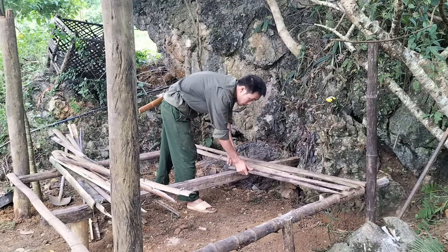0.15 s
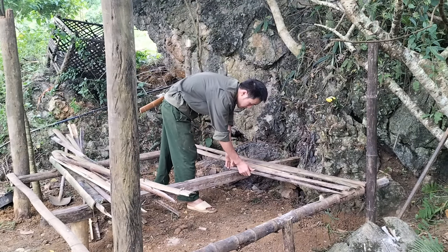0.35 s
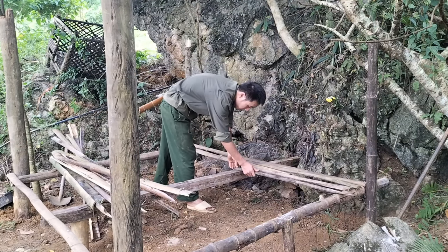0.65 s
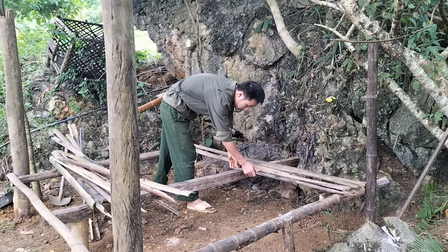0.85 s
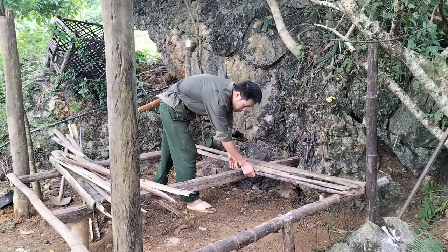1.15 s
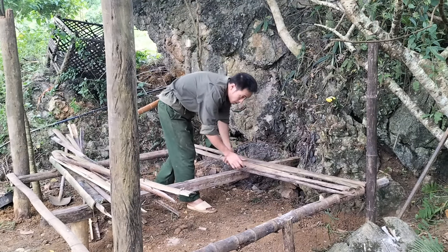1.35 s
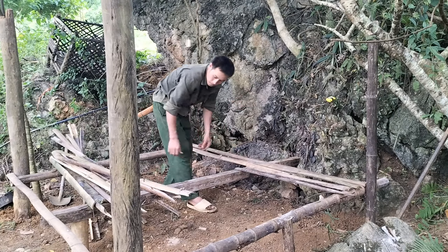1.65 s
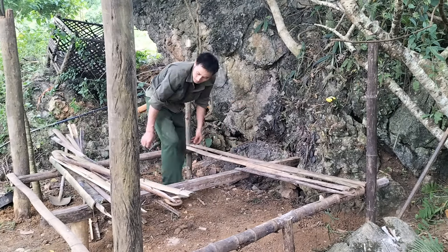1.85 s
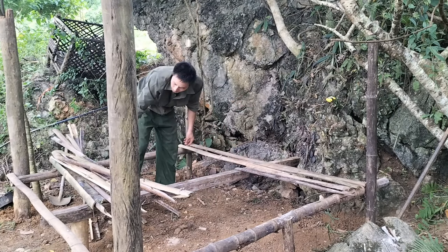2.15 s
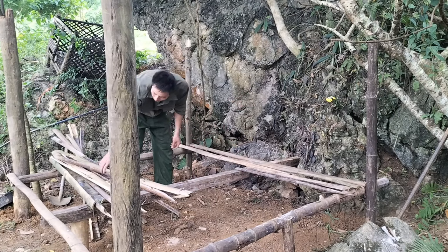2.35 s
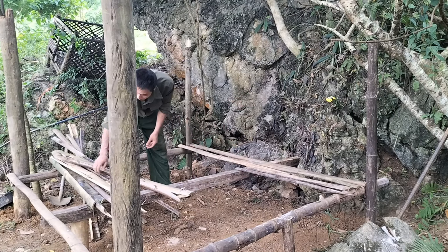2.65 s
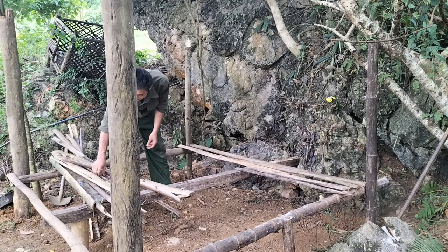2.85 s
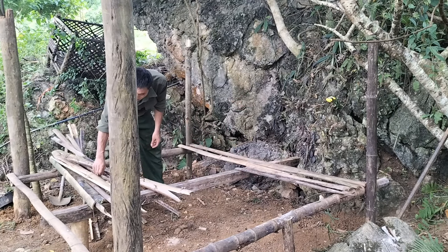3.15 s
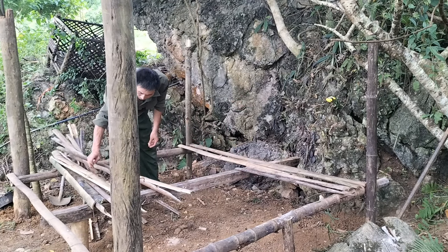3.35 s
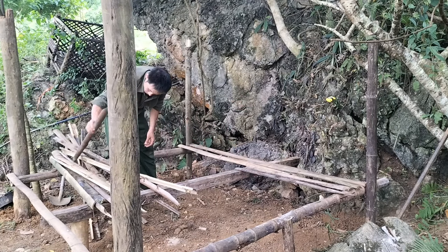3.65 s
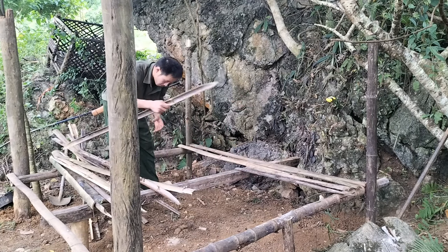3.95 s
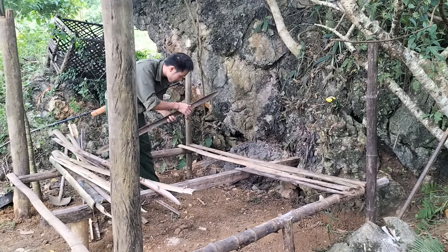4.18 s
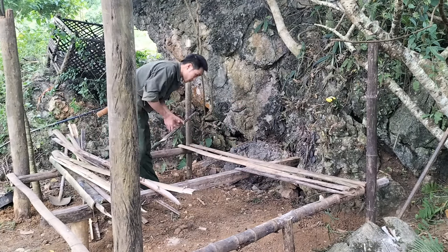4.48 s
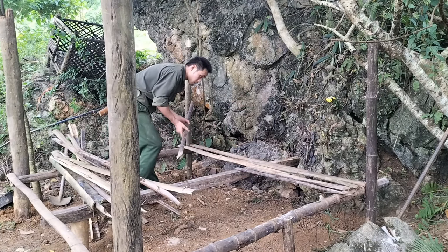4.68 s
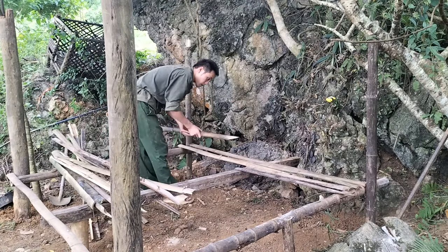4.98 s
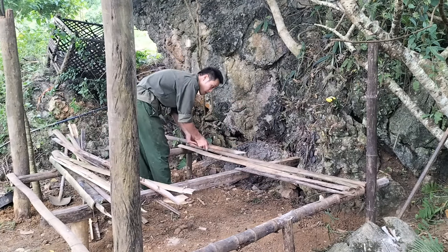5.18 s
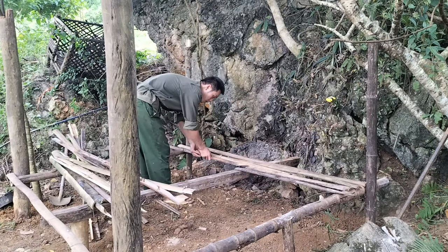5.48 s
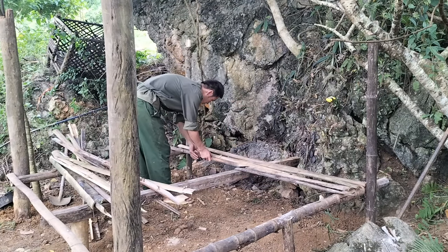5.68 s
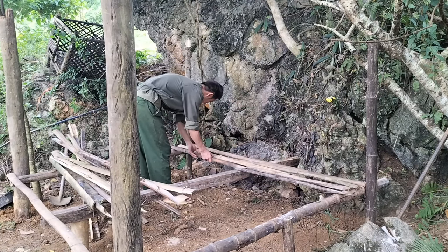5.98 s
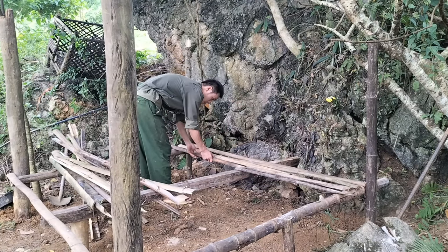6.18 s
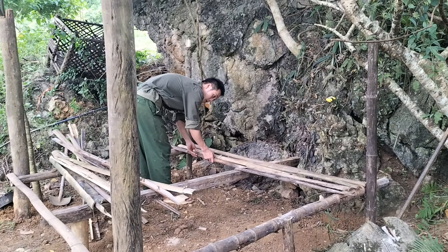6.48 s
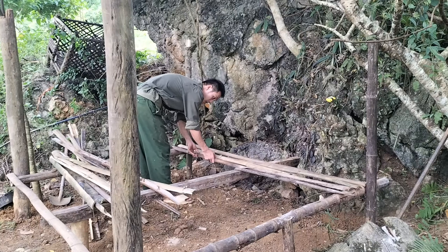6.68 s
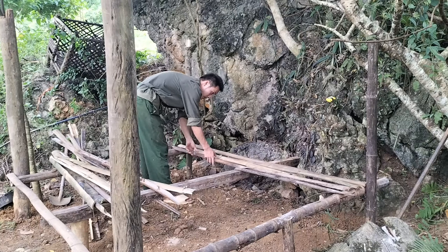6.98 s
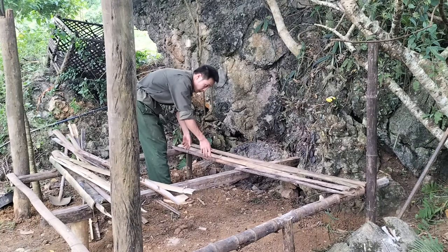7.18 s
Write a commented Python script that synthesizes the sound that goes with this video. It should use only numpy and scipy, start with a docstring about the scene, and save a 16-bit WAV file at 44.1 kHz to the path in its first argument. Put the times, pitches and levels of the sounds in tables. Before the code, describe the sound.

Dry wooden knocks, a rattling slat dragged from a heap and set down hard, over steady insect drone and bird chirps outdoors.

```python
"""Bamboo slats knock on a wooden frame under a rock face: each blow cracks, rattles and rings, with a diffuse echo.
All along, the forest air hisses, two cicadas pulse and a third insect buzzes about twice a second.
Birds join in with a falling trill, whistles, slurs, sharp chips, piping and one long thin whistle.
Then slats knock in a pile, and one is dragged off it, its scrape made of many tiny slips; a fibre snaps.
The slat is laid down with more knocks on the frame, and hollow poles answer with damped notes."""
import sys
import numpy as np
from scipy import signal
from scipy.fft import rfft, irfft
from scipy.io import wavfile

SR = 44100
rng = np.random.default_rng(int(sys.argv[2]) if len(sys.argv) > 2 else 0)


def log_audio(samples):
    """Write samples as a 16-bit WAV file to the path given in sys.argv[1]."""
    # one column per channel
    frames = np.atleast_2d(samples).T
    # limit to full scale, then quantise
    limited = np.clip(frames, -1, 1)
    pcm = np.round(limited * 32767).astype(np.int16)
    wavfile.write(sys.argv[1], SR, pcm)


N = 323253
TIME = np.arange(N) / SR


def undb(db):
    """Turn decibels into a gain."""
    return 10 ** (np.asarray(db) / 20)


def unit(x):
    """Scale to an rms (average strength) of 1."""
    return x / np.sqrt(np.mean(x ** 2) + 1e-24)


def add(out, s, x):
    """Mix x into out from time s."""
    i = int(np.clip(s * SR, 0, N))
    out[i:i + len(x)] += x[:N - i]


def clock(length_s):
    """Sample times of a short sound, in seconds."""
    return np.arange(int(length_s * SR)) / SR


def fade(t, t60):
    """Exponential decay that falls 60 dB in t60 seconds."""
    return np.exp(-np.log(1000) * t / max(t60, 1e-3))


def gate(s, attack_s, hold_s, release_s):
    """Level that rises from time s, holds, then decays 60 dB in release_s."""
    t = TIME - s
    rise = np.clip(t / max(attack_s, 1e-3), 0, 1)
    return rise * fade(np.maximum(t - attack_s - hold_s, 0), release_s)


def walk(rate, size=N):
    """Smooth random wander: chance levels, rate of them per second, joined by straight lines."""
    levels = rng.standard_normal(2400)
    return np.interp(np.arange(size) * rate / SR, np.arange(len(levels)), levels)


def colour(x, points):
    """Filter through (Hz, dB) points, without any sound ahead of its cause (minimum phase)."""
    hz, db = np.transpose(points)
    size = 2048
    f = np.arange(size // 2 + 1) * SR / size
    curve_db = np.interp(np.log(f + 1), np.log(hz), db)
    # folding the cepstrum puts the filter's energy as early as possible
    cepstrum = irfft(np.log(undb(curve_db)))
    cepstrum[1:size // 2] *= 2
    cepstrum[size // 2 + 1:] = 0
    impulse = irfft(np.exp(rfft(cepstrum)))
    return signal.fftconvolve(x, impulse)[:len(x)]


def ring(x, modes, dead_db):
    """Bamboo body: distinct bending modes over a quickly damped rest, here the plain input."""
    out = undb(dead_db) * x
    for hz, width, db in modes:
        b, a = signal.iirpeak(hz, hz / width, SR)
        out = out + undb(db) * signal.lfilter(b, a, x)
    return out


def echo(x, t60, wet_db, delay_s):
    """Direct sound plus a diffuse tail: many reflections blur into decaying noise."""
    t = clock(.5)
    noise = rng.standard_normal(len(t)) * fade(t, t60) * (t > delay_s)
    tail = unit(noise) / np.sqrt(len(t))
    return x + undb(wet_db) * signal.oaconvolve(x, tail)[:len(x)]


def note(length_s, pitches, rasp):
    """A whistle gliding through start, middle and end pitch; fast flutter (a bird's syrinx) makes it raspy."""
    t = clock(length_s)
    u = t / length_s
    flutter = walk(700, size=len(t))
    glide = np.polyval(np.polyfit([0, .5, 1], pitches, 2), u)
    hz = glide * (1 + .14 * rasp * flutter)
    return np.sin(2 * np.pi * np.cumsum(hz) / SR) * np.sin(np.pi * u) ** 0.74


def slur(hz, rasp):
    """A bird's down-slur: the pitch of its whistle slides down past hz."""
    return note(0.065, hz * np.array((1.2, 0.98, 0.68)), rasp)


# Harder blows rattle longer: level of a firm blow, and how many dB more double the decay time.
RATTLE_AT_DB, RATTLE_DOUBLING_DB = -46, 34.5
# Tone colour of a blow. Each row: frequency in Hz, level in dB.
CONTACT_COLOUR = [(60, -42), (115, -32), (190, -8), (300, -2), (600, -6.5), (1100, -0.5), (1950, -5),
                  (2800, -1.5), (3900, -3.5), (4700, -14.5), (6000, -14.5), (7500, -29.5), (9000, -44),
                  (15000, -61.5)]


def knocks(table, modes, rattle_s, crack_db, dead_db):
    """A soft start, a hard crack, then a rattle of tiny contacts; where the slat is hit sets its bass and treble."""
    out, t = np.zeros(N), clock(.2)
    bands = ((500, "low"), ((500, 2000), "band"), (2000, "high"))
    splits = [signal.butter(3, hz, kind, fs=SR, output="sos") for hz, kind in bands]
    since_crack = np.maximum(t - .0015, 0)  # the crack comes 1.5 ms in
    for s, db, bass, treble in table:
        t60 = rattle_s * 2 ** ((db - RATTLE_AT_DB) / RATTLE_DOUBLING_DB)
        chance = rng.standard_normal((3, len(t)))
        contacts = chance[0] * undb(4.75 * chance[1])  # very uneven in strength
        rattle = unit(contacts * fade(t, t60) * (1 - fade(t, 0.021)))
        crack = unit(chance[2] * (since_crack > 0) * fade(since_crack, 0.0056))
        force = (rattle + undb(crack_db) * crack) / np.sqrt(len(t))
        blow = ring(colour(force, CONTACT_COLOUR), modes, dead_db)
        for sos, band_db in zip(splits, (bass, 0, treble)):
            add(out, s, undb(db + band_db) * unit(signal.sosfilt(sos, blow)))
    return out


# Slat against frame. Each row: start in seconds, level in dB between 500 and 2000 Hz,
# then bass and treble in dB against that level.
FRAME_KNOCKS = [(0.0, -46.5, -18.5, 2.5), (0.075, -49.5, -20, -0.5), (0.121, -60.5, -14, 0),
                (0.168, -67, -17, 3.5), (0.969, -78.5, -22, -3), (1.003, -76, -15, -18),
                (1.308, -73.5, -12, -8), (1.582, -73, -11, -8), (1.604, -71.5, -11, -28),
                (4.522, -46, -6.5, -7.5), (4.636, -71, -21, -14), (4.751, -58.5, -18, 5.5),
                (4.95, -72.5, -17, -4), (5.068, -75.5, -18, -1), (5.34, -81, -9, -6.5),
                (5.556, -63, -21, -5.5), (5.609, -39.5, -11, -4.5), (6.026, -66.5, -2, -14),
                (6.249, -74, 8.5, -21), (6.459, -71.5, -18, -2), (6.886, -71, -13, -6),
                (6.948, -85.5, -16, -3), (7.04, -78.5, -16, -7), (7.166, -72, -14, -14)]
# Resonances of slat and frame. Each row: frequency in Hz, width in Hz, level in dB.
FRAME_MODES = [(203, 29, -9), (372, 56, -3), (641, 100, -3), (856, 99, -4), (1013, 43, 0), (1122, 31, 0.5),
               (1317, 55, -0.5), (1510, 41, -14), (2180, 31, -13), (2610, 31, -1.5), (2760, 32, -10.5),
               (2780, 51, -9), (3646, 28, -3.5), (3690, 87, -5.5), (3980, 32, -7.5)]


def frame_knocks():
    """Slats strike the wooden frame and set off its resonances; a firm blow rattles for 0.096 s (t60)."""
    return knocks(FRAME_KNOCKS, FRAME_MODES, rattle_s=0.096, crack_db=-2.5, dead_db=-5)


# Hollow notes of the poles. Each row: start in seconds, pitch in Hz, level in dB before the fade.
POLE_NOTES = [(0.002, 101, -58.5), (0.004, 245, -51), (0.08, 97.3, -62), (0.34, 660, -53),
              (1.002, 964, -49.5), (2.594, 677, -50), (2.632, 243, -48.5), (3.845, 241, -40.5),
              (3.867, 174, -54), (4.067, 1136, -38), (4.525, 171, -48.5), (4.527, 247, -44.5),
              (4.53, 374.5, -38), (5.615, 195.6, -48), (6.255, 400.6, -47.5), (6.735, 1087, -40.5)]
POLE_CYCLES = 39  # a pole's note falls 60 dB in this many cycles


def pole_notes():
    """The hollow poles answer with a damped, slightly unsteady note."""
    out, t = np.zeros(N), clock(.5)
    for s, hz, db in POLE_NOTES:
        tone = np.sin(2 * np.pi * hz * t + 1.7 * walk(80, len(t)))
        add(out, s, undb(db) * tone * fade(t, POLE_CYCLES / hz) * (1 - fade(t, 0.011)))
    return out


TICKS_PER_S, TICKS_DB = 30, -81


def handling():
    """Hands and feet raise sparse, soft little ticks from slats and soil, at random moments."""
    ticks = (rng.random(N) < TICKS_PER_S / SR) * undb(1.5 * rng.standard_normal(N))
    soft = colour(ticks, [(100, -8.5), (350, -6), (900, 6.5), (1600, 1.5), (2800, -5), (6000, -44.5)])
    return unit(echo(soft, t60=0.16, wet_db=11, delay_s=.002)) * undb(TICKS_DB)


# Colour of the forest air. Each row: frequency in Hz, level in dB per Hz before scaling.
AIR_COLOUR = [(25, -10.5), (55, 2.5), (100, 1.5), (200, -2), (400, -1.5), (700, -8.5), (1100, -4),
              (1900, -13.5), (2900, -6.5), (3600, -8), (5400, -3), (6600, -9), (7900, 8.5), (8700, -54)]
# Colour of the thin sizzle. Each row: frequency in Hz, level in dB before scaling.
SIZZLE_COLOUR = [(10000, -34), (11000, -11.5), (11900, -2), (12700, -6), (14000, -2.5), (15100, 4),
                 (16000, -5)]
AIR_DB, SIZZLE_DB = -67, -80


def forest():
    """Faint moving air, with a thin sizzle on top: two filtered noises that waver in level."""
    air = unit(colour(rng.standard_normal(N), AIR_COLOUR))
    sizzle = unit(colour(rng.standard_normal(N), SIZZLE_COLOUR))
    return air * undb(AIR_DB + 0.95 * walk(12)) + sizzle * undb(SIZZLE_DB + 1.1 * walk(30))


def cicada(beat, rate_hz, band, chorus_db, uneven_s):
    """Each beat buckles the tymbals in a few gliding chirps; far companions blur into a band of hiss."""
    out = np.zeros(N)
    chance = rng.standard_normal((300, len(beat), 3))
    slip_s = uneven_s * rng.standard_normal(len(chance))
    for k in range(min(int(N / SR * rate_hz) + 1, len(chance))):
        for (delay, start, end, length, db), (late, loud, sharp) in zip(beat, chance[k]):
            u = clock(length) / length
            hz = start + (end - start) * u + 18 * sharp
            # the abdomen's resonance keeps one beat nearly in step with the next
            phase = 2 * np.pi * (np.cumsum(hz) / SR + 0.041 * late)
            chirp = undb(db + 0.36 * loud) * np.sin(phase) * np.sin(np.pi * u)
            add(out, k / rate_hz + slip_s[k] + delay, chirp)
    # leaves smear the beats a little
    out = echo(out, t60=.05, wet_db=-7, delay_s=.0015)
    edges_hz = (band[1][0], band[-2][0])
    out = signal.sosfilt(signal.butter(8, edges_hz, "band", fs=SR, output="sos"), out)
    chorus = unit(colour(rng.standard_normal(N), band))
    return unit(unit(out) + undb(chorus_db) * chorus)


# One beat of the high cicada. Each row: delay in seconds, start and end pitch in Hz,
# length in seconds, level in dB against the other rows.
HIGH_BEAT = [(0, 7540, 7470, 0.0087, 1), (.007, 7460, 6600, 0.011, -3), (.0155, 7500, 7400, 0.0035, -2.5),
             (.0255, 7300, 7100, 0.0029, -12.5)]
# Hiss of its far companions. Each row: frequency in Hz, level in dB before scaling.
HIGH_BAND = [(6200, -40.5), (6700, -25.5), (7050, -1.5), (7500, 15), (7750, -12.5), (7950, -3), (8200, -26),
             (8600, -69)]
HIGH_DB = -57
LULL_S, LULL_END_S, LULL_RAMP_S, LULL_DB = 3.32, 4.58, 0.13, -5  # it eases off once


def high_cicada():
    """The near cicada pulses 29.85 times a second; it and its companions' hiss share one lull."""
    high = cicada(HIGH_BEAT, 29.85, HIGH_BAND, chorus_db=1.5, uneven_s=0)
    lull = np.clip(np.minimum(TIME - LULL_S, LULL_END_S - TIME) / LULL_RAMP_S, 0, 1)
    return high * undb(HIGH_DB + LULL_DB * lull)


# One beat of the low cicada. Each row: delay in seconds, start and end pitch in Hz,
# length in seconds, level in dB against the other rows.
LOW_BEAT = [(0, 4400, 4540, 0.0075, -3.5), (.009, 4350, 3950, .012, -9.5), (.02, 5050, 4650, .012, -10)]
# Hiss of its far companions. Each row: frequency in Hz, level in dB before scaling.
LOW_BAND = [(3300, -34), (3750, 2), (3950, 5.5), (4500, 12), (4850, 2.5), (5100, 8.5), (5220, -30.5),
            (5800, -52.5)]


def low_cicada():
    """A softer, lower cicada buckles its tymbals about 28.5 times a second, a little unevenly."""
    return undb(-66) * cicada(LOW_BEAT, 28.5, LOW_BAND, chorus_db=1.5, uneven_s=.003)


def faint_calls():
    """Many faint slurs and whistles from deep in the forest, at random times and pitches."""
    out = np.zeros(N)
    for k, (late, high, loud) in enumerate(rng.random((30, 3))):
        add(out, (k + late) * N / SR / 30, undb(-78.5 + 4 * loud) * slur(3000 + 600 * high, rasp=.1))
    for when, high, fall, loud in rng.random((36, 4)):
        pitches = (2400 + 1300 * high) * (1 - 0.3 * fall) ** np.arange(0, 1.5, .5)
        add(out, when * N / SR, undb(-72.5 + 4 * loud) * note(0.053, pitches, rasp=0.12))
    return out


# A far bird's falling trill. Each row: start in seconds, level of the first note in dB.
TRILLS = [(0.098, -58), (1.85, -58.5), (4.55, -61.5), (5.651, -59), (6.66, -58.5)]


def trills():
    """A far bird repeats a short falling note 12 times, sinking and fading as it runs out."""
    out = np.zeros(N)
    for s, db in TRILLS:
        for k in range(12):
            loud, sharp, late = rng.standard_normal(3)
            pitches = np.array([1210, 1170, 1100]) - 9 * k + 25 * sharp
            level = undb(db - 1.0 * k + 1.5 * loud)
            add(out, s + k * .052 + .003 * late, level * note(.028, pitches, rasp=.3))
    return out


BUZZ_FIRST_S, BUZZ_LENGTH_S, BUZZ_DB = 0.14, .18, -70.5
BUZZ_PERIOD_S, BUZZ_SLOWING_S = .49, .0068  # each period is longer than the last by the slowing


def buzzing_insect():
    """A third insect buzzes at a slowly slackening pace: a raspy note whose level throbs at 92 Hz."""
    buzz, s = np.zeros(N), BUZZ_FIRST_S
    throb = 1 + 0.53 * np.sin(2 * np.pi * 92 * clock(BUZZ_LENGTH_S))
    for k, loud in enumerate(rng.standard_normal(14)):
        tone = note(BUZZ_LENGTH_S, (5950, 6180, 6150), rasp=.2)
        add(buzz, s, undb(BUZZ_DB + loud) * tone * throb)
        s += BUZZ_PERIOD_S + k * BUZZ_SLOWING_S
    return echo(buzz, t60=0.13, wet_db=2.5, delay_s=0.0026)


# Short falling whistles. Each row: start in seconds, middle pitch in Hz,
# fall as a share of the pitch, rasp from 0 to 1, level in dB.
WHISTLES = [(0.481, 2910, 0.2, 0.1, -52), (0.731, 3295, .08, 0.27, -70), (0.758, 2190, 0.1, 0.17, -66.5),
            (1.355, 3140, 0.09, 0.7, -61), (1.405, 2318, .03, 0.28, -61.5), (1.79, 2800, .04, .2, -61.5),
            (2.105, 3510, 0.13, 0.2, -70), (2.375, 2635, .24, .35, -64.5),
            (2.462, 3234, 0.019, 0.12, -62.5), (2.825, 2990, 0.05, 0.13, -58.5),
            (4.63, 2853, 0.078, .1, -63), (4.672, 2236, 0.044, 0.17, -62.5), (5.306, 2554, .14, 0.2, -69),
            (5.788, 2560, 0.14, .1, -69.5), (6.542, 2196, 0.17, 0.37, -63.5),
            (6.775, 2330, 0.19, 0.5, -68.5), (7.19, 2275, 0.29, 0.22, -54.5)]


def whistles():
    """Near birds whistle for 64 ms, each note gliding down."""
    out = np.zeros(N)
    for s, hz, fall, rasp, db in WHISTLES:
        pitches = (hz * (1 + fall / 2), hz, hz * (1 - fall / 2))
        add(out, s, undb(db) * note(.064, pitches, rasp))
    return out


# One bird's down-slurs. Each row: start in seconds, pitch near the middle in Hz, level in dB.
SLURS = [(1.037, 3490, -69), (1.23, 3350, -71.5), (1.739, 3430, -64), (1.859, 3350, -60),
         (2.861, 3330, -71), (3.04, 3320, -65), (3.2, 3950, -62), (3.384, 4140, -55.5), (4.39, 3350, -63),
         (4.699, 3390, -65), (5.236, 3400, -69), (5.43, 3420, -67.5), (5.972, 3350, -74), (6.11, 3400, -76),
         (6.911, 3420, -70), (7.135, 3470, -68.5)]


def slurs():
    """A near bird lets its whistle slide steeply down."""
    out = np.zeros(N)
    for s, hz, db in SLURS:
        add(out, s, undb(db) * slur(hz, rasp=0.15))
    return out


# Sharp chips. Each row: start in seconds, start pitch in Hz, end pitch in Hz, level in dB.
CHIPS = [(1.434, 2020, 3230, -61), (1.446, 3740, 2630, -56), (1.464, 2150, 3460, -51),
         (1.481, 3310, 1610, -53.5), (1.489, 1460, 2420, -56), (1.897, 3820, 2005, -42.5),
         (1.905, 3860, 2300, -49), (2.282, 3920, 2560, -51), (2.293, 3290, 2380, -48)]


def chips():
    """Bursts of sharp chips, each one fast sweep of pitch in 13 ms."""
    out = np.zeros(N)
    for s, start, end, db in CHIPS:
        add(out, s, undb(db) * note(.013, (start, np.sqrt(start * end), end), rasp=.22))
    return out


# Runs of soft piping. Each row: start in seconds, number of notes, seconds between notes,
# pitch in Hz, level in dB.
PIPING = [(1.629, 4, .16, 2710, -60.5), (5.755, 14, .11, 2755, -69.5)]


def piping():
    """A far bird pipes softly on one pitch, each note a little louder or softer by chance."""
    out = np.zeros(N)
    for s, count, period, hz, db in PIPING:
        for k in range(round(count)):
            level = undb(db + 2 * rng.standard_normal())
            add(out, s + k * period, level * note(0.061, (hz, hz, hz), rasp=0.084))
    return out


# Slats knocking in the pile. Each row: start in seconds, level in dB between 500 and 2000 Hz,
# then bass and treble in dB against that level.
PILE_KNOCKS = [(1.805, -72.5, -27, -13), (2.118, -68, -23, -14), (2.295, -67, -27, -8),
               (2.42, -67, -20, -6), (2.591, -55, -13, -4.5), (2.632, -55.5, -4, -6.5),
               (2.751, -63.5, -16, -5.5), (2.777, -68.5, -9, -10), (2.944, -77.5, -18, -1),
               (2.99, -75.5, -11, -18), (3.14, -73.5, -14, -22), (3.275, -66.5, -2.5, -21),
               (3.361, -68, -10, -23), (3.493, -59.5, -20, 3.5), (3.504, -54, -33, 2),
               (3.59, -58.5, -15, 1), (3.621, -57.5, -19.5, 6.5), (3.683, -65, -18, 11),
               (3.746, -62, 1, -1.5), (3.782, -50.5, -6, 0.5), (3.826, -39.5, -9, 5),
               (3.921, -53.5, 0.5, -14), (4.067, -70, -7, -25)]
# Resonances of the piled slats. Each row: frequency in Hz, width in Hz, level in dB.
PILE_MODES = [(326, 17, -11.5), (630, 69, -7.5), (855, 220, -3.5), (1076, 38, -4), (1354, 110, -1),
              (1680, 13, -6), (1815, 91, -6), (2290, 190, -5.5), (2660, 38, -1.5), (2790, 24, -6),
              (2850, 23, -22), (3160, 190, -8), (3450, 51, -6.5), (3600, 39, -8), (4430, 65, -20)]


def pile_knocks():
    """Slats knock together and ring with the pile's resonances; a firm blow rattles for 0.094 s (t60)."""
    return knocks(PILE_KNOCKS, PILE_MODES, rattle_s=0.094, crack_db=-1, dead_db=-5.5)


THIN_S, THIN_END_S, THIN_RELEASE_S = 2.22, 3.39, 0.12
THIN_HZ, THIN_RISE_HZ_PER_S, THIN_DB, THIN_SWELL_DB_PER_S = 5300, 215, -74, 11


def thin_whistle():
    """A high, fluttering tone that climbs and swells, wavering a little, then quickly dies away."""
    t = np.clip(TIME, THIN_S, THIN_END_S) - THIN_S
    swell = undb(THIN_DB + THIN_SWELL_DB_PER_S * t + 2 * walk(24.73))
    level = gate(THIN_S, 0, THIN_END_S - THIN_S, THIN_RELEASE_S) * swell
    flutter = 1 + .8 * np.sin(2 * np.pi * 48 * TIME + walk(20))
    hz = THIN_HZ + THIN_RISE_HZ_PER_S * t + 50 * walk(320)
    return level * flutter * np.sin(2 * np.pi * np.cumsum(hz) / SR)


# A slat slides over the pile. Each row: start in seconds, attack in seconds, hold in seconds,
# level in dB, extra dB in the low body.
SLIDES = [(2.515, 0.088, 0.073, -53.5, 7.5), (3.176, 0.047, 0.066, -64, 10), (3.349, 0.047, 0.12, -57.5, 1),
          (3.478, 0.029, 0.19, -43.5, -2), (3.743, 0.048, 0.062, -37, 4.5), (3.872, 0.022, 0.055, -53.5, 9),
          (4.192, 0.036, 0.076, -69.5, 3)]
# Tone colour of the scrape. Each row: frequency in Hz, level in dB before scaling.
SLIDE_COLOUR = [(60, -20), (150, -19), (300, -3), (1000, 0.5), (2400, -1), (3700, -1.5), (4600, -11),
                (6200, -5.5), (7500, -27), (9000, -40), (15000, -32)]
SLIDE_RELEASE_S = 0.2  # t60 once the slat stops
SLIDE_BODY_HZ, SLIPS_PER_S, SLIP_BURST_DB = (200, 810), 330, 3.5


def drag():
    """Fibres catch and slip in uneven bursts on two slats of different length, which ring at two pitches."""
    body = np.zeros(N)
    for pitch in (1, 1.08):
        slips = (rng.random(N) < SLIPS_PER_S / SR) * rng.standard_normal(N)
        slips = slips * undb(SLIP_BURST_DB * walk(110))
        body += ring(slips, np.array(PILE_MODES) * (pitch, 1, 1), dead_db=-9)
    scrape = unit(echo(colour(body, SLIDE_COLOUR), t60=0.053, wet_db=0.0, delay_s=.002))
    low = signal.sosfiltfilt(signal.butter(2, SLIDE_BODY_HZ, "band", fs=SR, output="sos"), scrape)
    out = np.zeros(N)
    for s, attack, hold, db, low_db in SLIDES:
        stroke = scrape + (undb(low_db) - 1) * low
        out += undb(db) * gate(s, attack, hold, SLIDE_RELEASE_S) * stroke
    return out


SNAP_S, SNAP_DB = 3.836, -36  # level before colouring


def snap():
    """A fibre snaps on the dragged slat with a very bright tick and a weaker, longer tail."""
    out, t = np.zeros(N), clock(.1)
    tick = rng.standard_normal(len(t)) * (fade(t, 0.025) + 0.096 * fade(t, .12))
    bright = [(300, -41.5), (2000, 0.5), (5500, -9), (9000, -9), (12000, -2.5), (15000, 2.5)]
    add(out, SNAP_S, undb(SNAP_DB) * colour(tick, bright))
    return out


def birds():
    """All the calls, scattered by rock and trees; the near birds get an extra early tail."""
    near = echo(whistles() + slurs() + chips(), t60=0.13, wet_db=1.0, delay_s=0.0044)
    far = faint_calls() + trills() + piping()
    return echo(near + far + thin_whistle(), t60=0.31, wet_db=-11.5, delay_s=0.011)


def scene():
    """Bamboo in front of the rock face, which throws its sound back, with the forest all round."""
    wood = frame_knocks() + pole_notes() + handling() + pile_knocks() + drag() + snap()
    insects = high_cicada() + low_cicada() + buzzing_insect()
    return (echo(wood, t60=0.17, wet_db=-10.5, delay_s=0.0087) + birds() + insects + forest())[None]


TOP_HZ = 15550


def record(dry):
    """A steep low-pass filter cuts the treble above TOP_HZ."""
    return signal.sosfilt(signal.ellip(10, .2, 70, TOP_HZ, fs=SR, output="sos"), dry)


dry = scene()
out = record(dry)
log_audio(out)
```